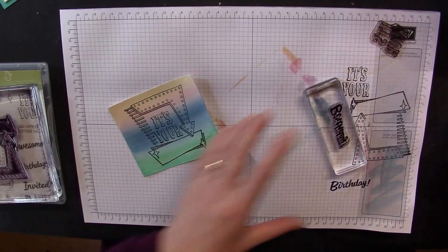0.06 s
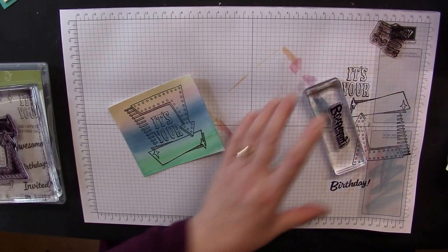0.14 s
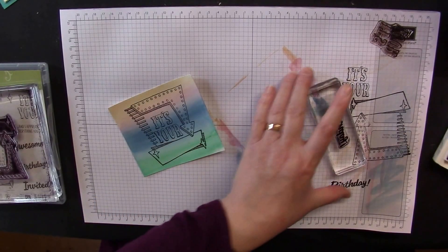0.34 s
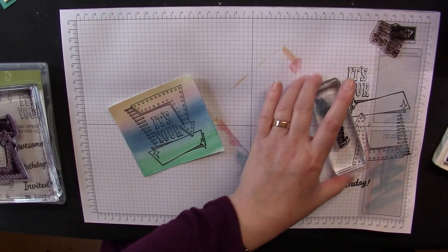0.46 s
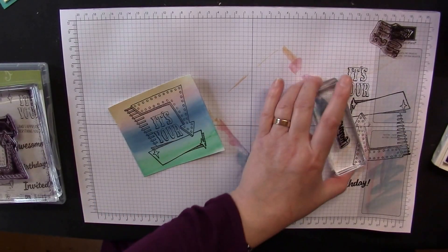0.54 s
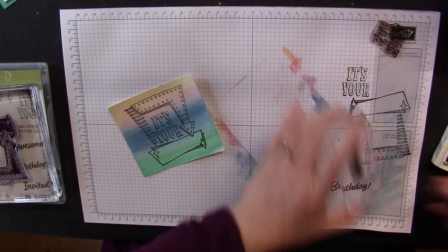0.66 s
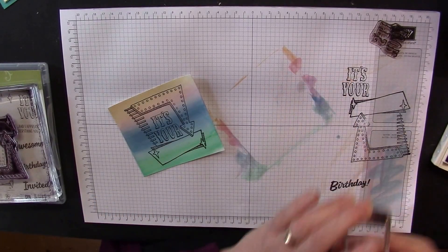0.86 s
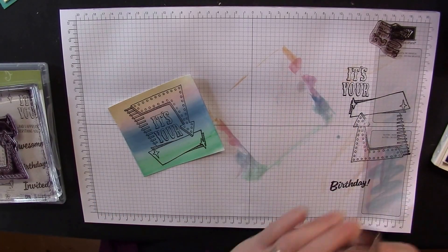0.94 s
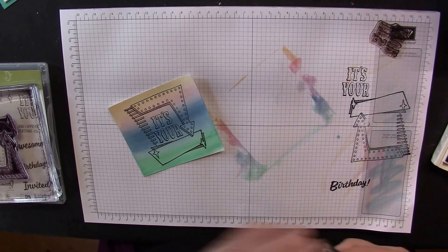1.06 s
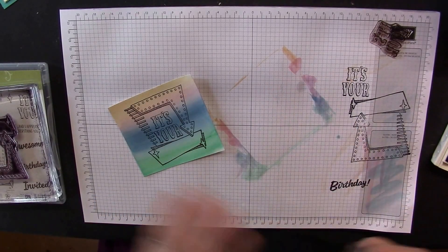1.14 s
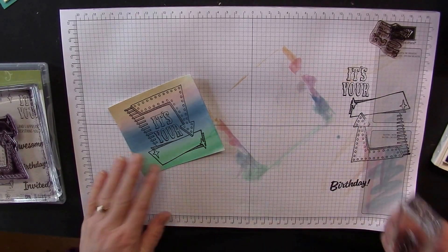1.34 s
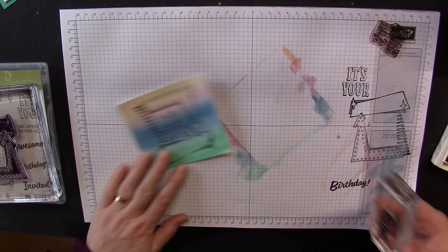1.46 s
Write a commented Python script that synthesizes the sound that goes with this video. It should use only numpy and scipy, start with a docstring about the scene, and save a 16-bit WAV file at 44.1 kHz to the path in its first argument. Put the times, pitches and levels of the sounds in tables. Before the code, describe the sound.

An acrylic stamp block clatters on a paper-covered desk, close by in a small room. Three quick groups of sharp knocks with rebounds and low thumps come at about 0.25, 0.35 and 0.5 seconds, dying away by 0.7. Very faint, distant whistles, perhaps a bird, sound near 0.9 and 1.35 seconds, with a light brush of a hand on paper near 1.15. Soft room hiss continues throughout.

```python
"""A stamp block clattering on a desk

A clear acrylic stamp block is rocked on paper, pulled free and clatters down: three groups of sharp knocks with
rebounds, heard close by in a small room. Each impact excites damped modes: the desk top thumps, the block's
body clacks and the block rings. Two faint, far whistles, perhaps a bird, and a light brush of the hand follow
over the room's steady hiss."""
import sys
import numpy as np
from scipy import signal
from scipy.fft import rfft, irfft
from scipy.io import wavfile
from scipy.ndimage import uniform_filter1d, minimum_filter1d

SR = 44100
rng = np.random.default_rng(int(sys.argv[2]) if len(sys.argv) > 2 else 0)


def to_wav(s):
    """Save 16-bit WAV."""
    ch = np.atleast_2d(s).T  # columns
    pcm = np.round(np.clip(ch, -1, 1) * 32767)  # PCM
    wavfile.write(sys.argv[1], SR, pcm.astype(np.int16))


N = 66150
TIME, BIN_HZ = np.arange(N) / SR, np.fft.rfftfreq(N, 1 / SR)

# Noise spectra. Each row: frequency in Hz, relative spectral density in dB.
HISS_SPECTRUM = [(15, -75), (25, -54), (80, -3.5), (117, -7), (206, 0), (363, -6.5), (394, 1), (463, -3.5),
                 (796, -7.5), (1840, -14), (2280, -15), (2550, -16), (5430, -18), (16000, -35.5)]
CRACK_SPECTRUM = [(100, -34), (600, -20), (1500, 9.5), (4000, 4), (6000, 0.5), (8000, -6.5), (11000, -20),
                  (16000, -33.5)]
BRUSH_SPECTRUM = [(200, -13.5), (1500, -13), (5000, 1), (8000, -9.5), (15000, -21)]
# Likeness of left and right, for the hiss and all other noise. Each row: frequency in Hz, coherence.
HISS_COHERENCE = [(60, 1), (180, 0.88), (550, 0.72), (1650, 0.73), (4970, 0.93), (15000, 0.91)]
COHERENCE = [(40, 1), (150, .999), (500, 1), (1000, 0.99), (2500, 0.96), (6000, 0.94), (14000, 0.95)]
# Contacts of the block. Each row: start in seconds, thump level in dB, clack level in dB,
# clack pitch in Hz, ring level in dB, ring pitch in Hz, crack level in dB.
CONTACTS = [(0.2252, -33, -29.5, 780, -44, 3000, -47), (0.2338, -9.5, -9, 950, -18.5, 2680, -19),
            (0.2706, -9, -13.5, 970, -17, 2450, -24.5), (0.2847, -5, -13.5, 980, -28.5, 2800, -29),
            (0.3546, -14, -3.5, 1090, -10.5, 5130, -14.5), (0.3805, -6, -11, 1000, -21.5, 2580, -24.5),
            (0.4189, -12.5, -12, 1020, -19, 2500, -32.5), (0.472, -15.5, -17.5, 700, -53, 2600, -21.5),
            (0.4734, -5.5, -3, 650, -6, 3060, -7), (.495, -28.5, -19, 750, -33, 3400, -15.5),
            (0.502, -14.5, -9.5, 710, -29.5, 3000, -14), (0.5213, -7.5, -5.5, 796, -17.5, 2740, -11.5),
            (0.5261, -5, -9.5, 790, -16, 2500, -28), (0.5523, -25.5, -12, 1150, -27.5, 2630, -21),
            (.5625, -26, -14, 1160, -27.5, 2170, -32.5)]
# Heavier blows that set the desk frame booming. Each row: start in seconds, level in dB.
HEAVY_BLOWS = [(0.2322, -27), (0.2712, -36), (.3580, -21.5), (0.38, -29), (0.489, -22.5), (0.5265, -28),
               (0.5509, -25)]
# Normal modes. Each row: frequency in Hz, relative level in dB, time to decay by 60 dB in seconds.
DESK_FRAME_MODES = [(107, -12.5, 0.33), (156.2, -4.5, 0.27), (189.4, -2, 0.24), (277.7, 6, 0.21),
                    (470.8, 3.5, 0.17), (537, -6.5, 0.23)]
DESK_TOP_MODES = [(297.8, -2, 0.043), (384.6, 1, 0.031), (403.4, -24.5, 0.19)]
BLOCK_BODY_MODES = [(579.7, -12, 0.075), (720, 2, 0.029), (807.6, -1, 0.024), (839, -13, 0.094),
                    (944, -6.5, 0.022), (1099, -4.5, 0.029), (1250, -7, 0.03), (1345, -8, 0.02)]
ACRYLIC_MODES = [(1512, -1.5, 0.017), (1845, -1.5, 0.018), (2293, -7, 0.018), (2880, -3.5, 0.012),
                 (3377, -1.5, 0.0064), (4460, -5.5, 0.018), (5020, 0, 0.003), (5860, -6, 0.0042),
                 (6910, -10.5, 0.01)]
# Strength of the reverberation. Each row: frequency in Hz, level against the direct sound in dB.
ROOM_GAIN = [(60, -8), (150, -6.5), (290, -9.5), (420, -1), (700, -5.5), (1500, -0.5), (3000, -2),
             (6000, -2.5), (14000, -5)]
# Reverberation time. Each row: frequency in Hz, time to decay by 60 dB in seconds.
ROOM_DECAY = [(60, 0.93), (150, 0.32), (400, 0.3), (1000, 0.19), (3000, 0.29), (12000, 0.26)]
# Glides, one list for each whistle. Each row: time in seconds, pitch in Hz, level in dB.
WHISTLE_GLIDES = [
    [(.85, 2450, -64), (.86, 2370, -57), (.882, 2180, -78.5), (.9, 2760, -62.5), (.915, 2740, -70),
     (.926, 2190, -56.5), (.96, 2120, -70), (.98, 2120, -80)],
    [(1.28, 2000, -85), (1.318, 2150, -61.5), (1.35, 2240, -71), (1.366, 2310, -54), (1.384, 2390, -55),
     (1.40, 2750, -74)],
]


def from_db(db):
    """Amplitude grows tenfold for every 20 dB."""
    return 10 ** (np.asarray(db) / 20)


def at_hz(points, hz):
    """Interpolation on a logarithmic frequency axis gives each octave equal room."""
    known_hz, values = np.transpose(points)
    return np.interp(np.log(np.maximum(hz, 1)), np.log(known_hz), values)


def stereo_noise(spectrum, coherence):
    """The balance of in-phase and antiphase noise sets the coherence of two channels; the rms is 1."""
    mid, side = rfft(rng.standard_normal((2, N)))
    alike = np.clip(at_hz(coherence, BIN_HZ), 0, .9995)
    white = np.sqrt(1 + alike) * mid + np.sqrt(1 - alike) * side * [[1], [-1]]
    noise = irfft(from_db(at_hz(spectrum, BIN_HZ)) * white, N)
    return noise / noise.std()


def room_hiss():
    """The room's background is stationary noise, partly coherent between left and right."""
    return from_db(-54.5) * stereo_noise(HISS_SPECTRUM, HISS_COHERENCE)


def damped_mode(times, levels_db, hz, t60):
    """A damped oscillator answers each impulse with an exponentially decaying sine."""
    impulses = np.zeros(N)
    np.add.at(impulses, (times * SR).astype(int), from_db(levels_db))
    decay, step = from_db(-60 / (t60 * SR)), 2 * np.pi * hz / SR  # per sample
    return signal.lfilter([0, np.sin(step)], [1, -2 * decay * np.cos(step), decay ** 2], impulses + 1e-18)


def strike(modes, times, levels_db, pitch_hz=1, focus_db=0):
    """Modes superpose; the point of contact favours one pitch, losing focus_db an octave away."""
    scatter_db = 2.55 * rng.standard_normal((len(times), len(modes)))
    out = 0
    for k, (hz, mode_db, t60) in enumerate(modes):
        loss_db = focus_db * np.log2(hz / pitch_hz) ** 2
        drive_db = levels_db + mode_db - loss_db + scatter_db[:, k]
        out = out + (-1) ** k * damped_mode(times, drive_db, hz, t60)
    return out


def radiate(vibration, cutoff_hz):
    """A surface small against the wavelength radiates poorly, so sound below the cutoff is weak."""
    return signal.sosfilt(signal.butter(2, cutoff_hz, "high", fs=SR, output="sos"), vibration)


def cracks(times, levels_db, pitches_hz, lift_db=5, width_octaves=0.39, t60=0.024):
    """The block's many fine modes merge into a brief noise burst, lifted around the ring pitch."""
    out, hz = 0, np.geomspace(100, 16000, 60)
    for start, db, pitch_hz in zip(times, levels_db, pitches_hz):
        lift = lift_db * np.exp(-.5 * (np.log2(hz / pitch_hz) / width_octaves) ** 2)
        spectrum = np.c_[hz, at_hz(CRACK_SPECTRUM, hz) + lift]
        envelope = (TIME >= start) * from_db(-60 * np.clip(TIME - start, 0, .5) / t60)
        out = out + from_db(db) * envelope * stereo_noise(spectrum, COHERENCE)
    return out


def knocks():
    """Impact sets both desk and block in free vibration; the paper cushions their highest tones."""
    times, thump_db, clack_db, clack_hz, ring_db, ring_hz, crack_db = np.transpose(CONTACTS)
    boom = radiate(strike(DESK_FRAME_MODES, *np.transpose(HEAVY_BLOWS)), cutoff_hz=81.6)
    thump = radiate(strike(DESK_TOP_MODES, times, thump_db), cutoff_hz=145)
    clack = radiate(strike(BLOCK_BODY_MODES, times, clack_db, clack_hz, focus_db=14), cutoff_hz=350)
    ring = radiate(strike(ACRYLIC_MODES, times, ring_db, ring_hz, focus_db=5), cutoff_hz=950)
    cushion = signal.butter(2, 9100, fs=SR, output="sos")
    return signal.sosfilt(cushion, boom + thump + clack + ring) + cracks(times, crack_db, ring_hz)


def reverberation(direct, delay_s=0.0031, build_s=0.00089):
    """Dense reflections build up, then decay exponentially, each half octave at its own rate."""
    centres_hz = 45 * 2 ** np.arange(0, 9, .5)
    age = np.maximum(TIME - delay_s, 0)
    onset = 1 - np.exp(-age / build_s)
    white = rfft(stereo_noise([(20, 0), (20000, 0)], COHERENCE))
    tail = 0
    for hz, weights in zip(centres_hz, np.eye(len(centres_hz))):
        band = irfft(white * at_hz(np.c_[centres_hz, weights], BIN_HZ), N)
        tail = tail + band * from_db(-60 * age / at_hz(ROOM_DECAY, hz))
    spectrum = rfft(tail * onset)
    # Even out the power over 70 Hz spans, then give it the room's colour.
    power = uniform_filter1d(np.mean(abs(spectrum) ** 2, axis=0), size=int(70 / BIN_HZ[1]))
    response = irfft(spectrum / np.sqrt(power) * from_db(at_hz(ROOM_GAIN, BIN_HZ)), N) * (age > 0)
    return signal.fftconvolve(direct, response[:, :N // 2], axes=1)[:, :N]


def whistles():
    """Each far whistle is a pure tone whose phase is the integral of its gliding frequency."""
    out = 0
    for glide in WHISTLE_GLIDES:
        times, hz, db = np.transpose(glide)
        envelope = np.interp(TIME, times, from_db(db), left=0, right=0)
        phase = 2 * np.pi * np.cumsum(np.interp(TIME, times, hz)) / SR
        out = out + envelope * np.sin(phase)
    return out


def hand_brush(peak_s=1.165, width_s=0.045):
    """Sliding friction of the hand on paper gives a soft swell of broadband noise."""
    swell = np.exp(-.5 * ((TIME - peak_s) / width_s) ** 2)
    return from_db(-62.5) * swell * stereo_noise(BRUSH_SPECTRUM, COHERENCE)


def scene(pan_db=0.12, dullness=0.042):
    """Sound pressures add: knocks and reflections, slightly duller on the right, and the faint sounds."""
    direct = knocks()
    left, right = direct + reverberation(direct)
    right = signal.lfilter([1 - dullness], [1, -dullness], right)
    clatter = np.array([left * from_db(pan_db), right * from_db(-pan_db)])
    return clatter + room_hiss() + whistles() + hand_brush()


def record(dry):
    """A fast limiter lowers the gain at peaks above full scale; filters then cut both band edges."""
    gain = 1 / np.maximum(abs(dry).max(axis=0), 1)
    gain = uniform_filter1d(minimum_filter1d(gain, size=61), size=61)
    bass_cut = signal.butter(2, 30, "high", fs=SR, output="sos")
    treble_cut = signal.cheby2(12, 70, 16800, fs=SR, output="sos")
    return signal.sosfilt(treble_cut, signal.sosfilt(bass_cut, dry * gain))


dry = scene()
out = record(dry)
to_wav(out)
```